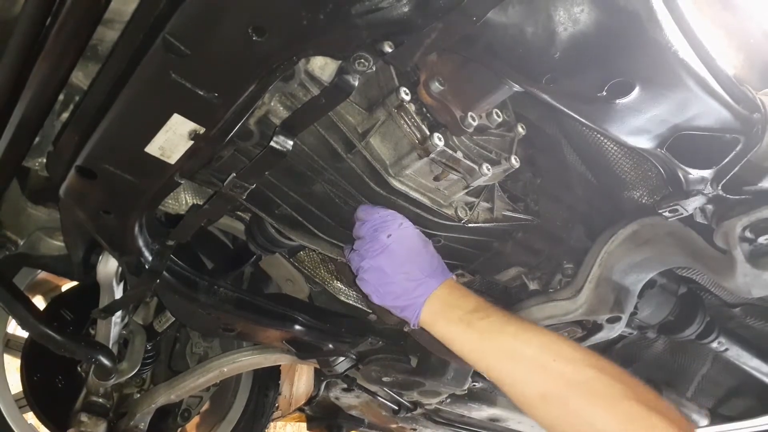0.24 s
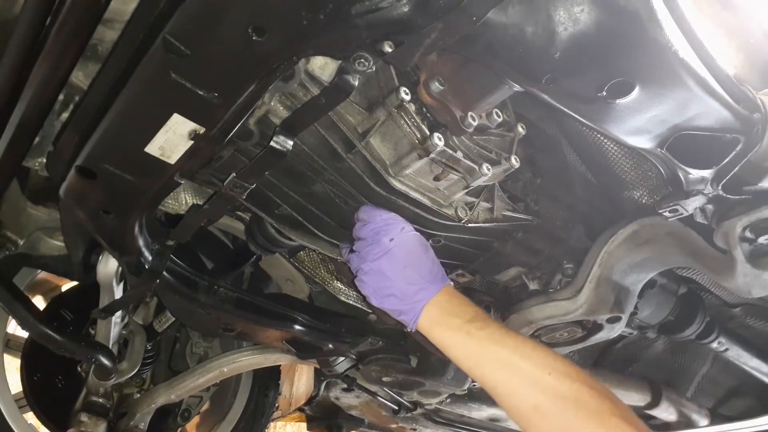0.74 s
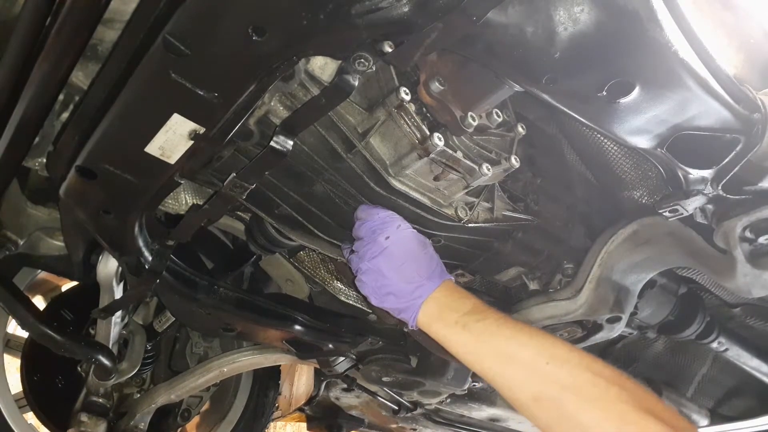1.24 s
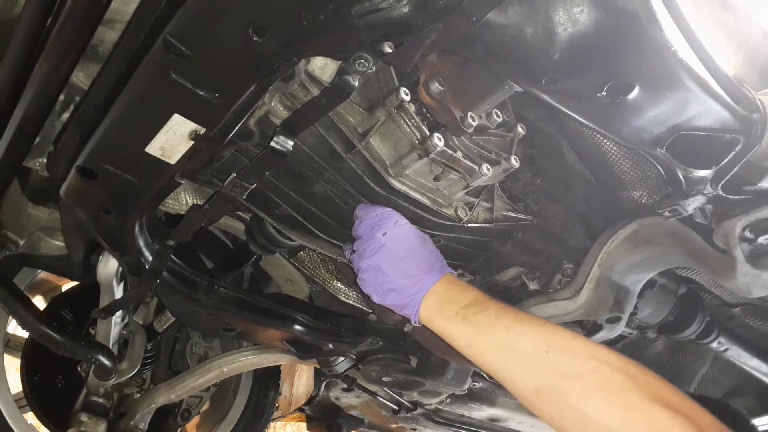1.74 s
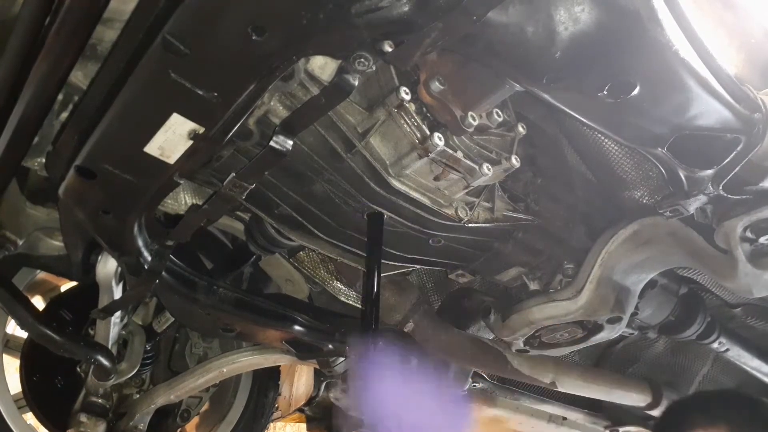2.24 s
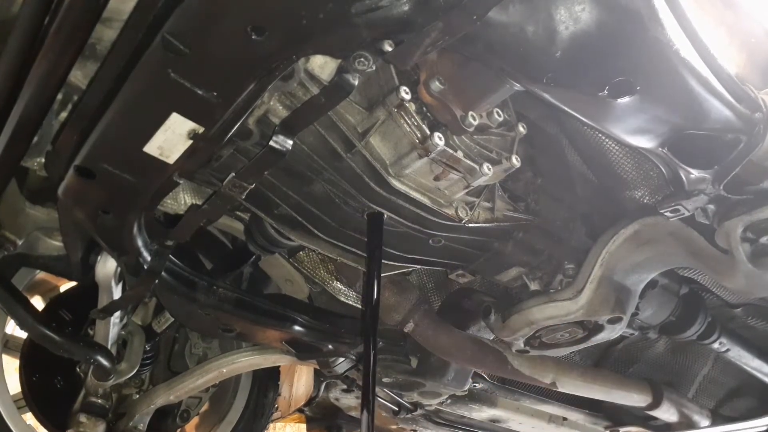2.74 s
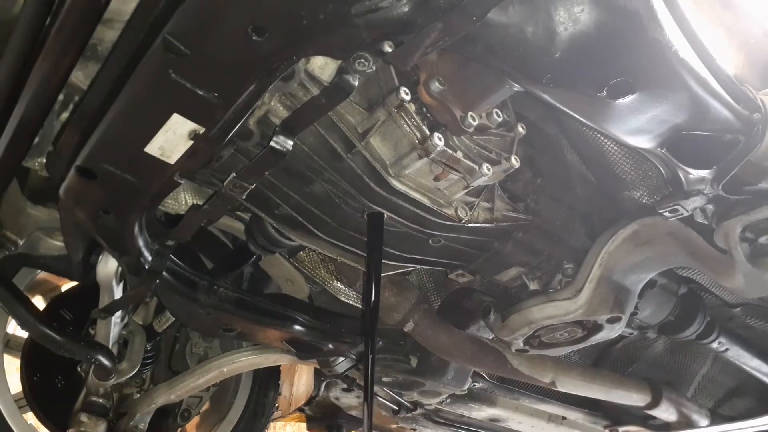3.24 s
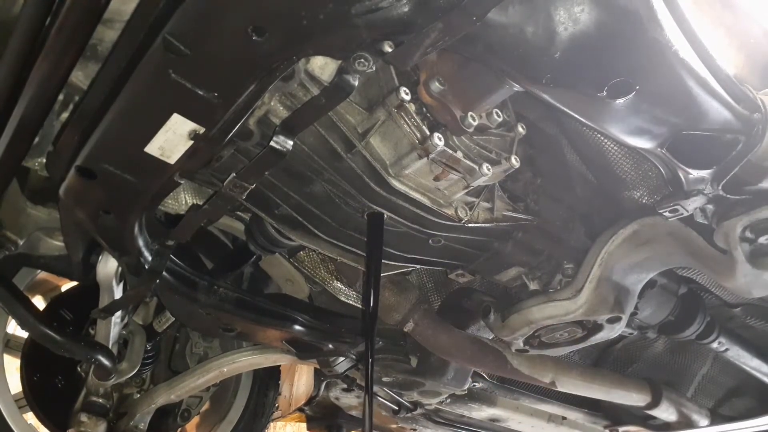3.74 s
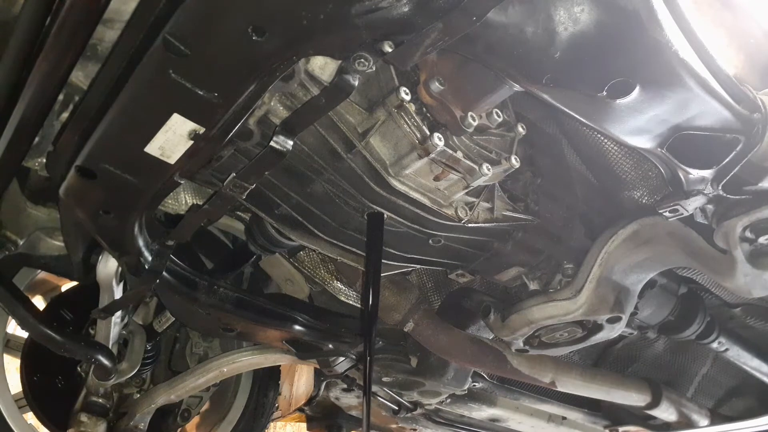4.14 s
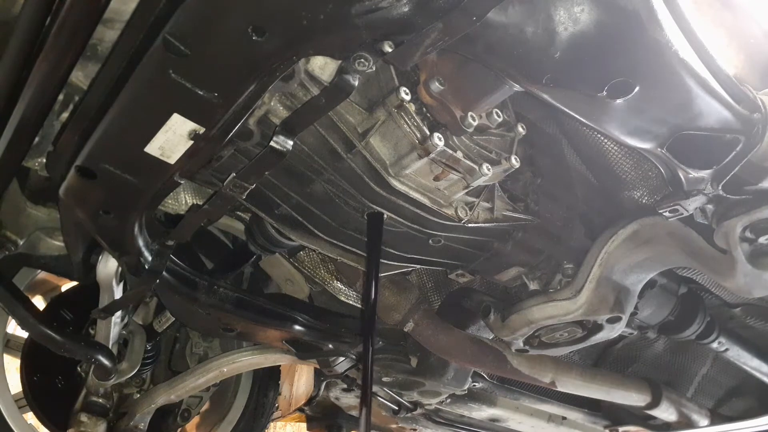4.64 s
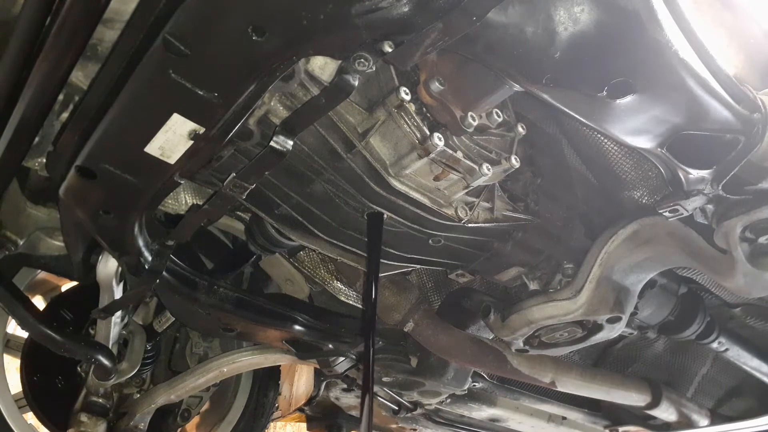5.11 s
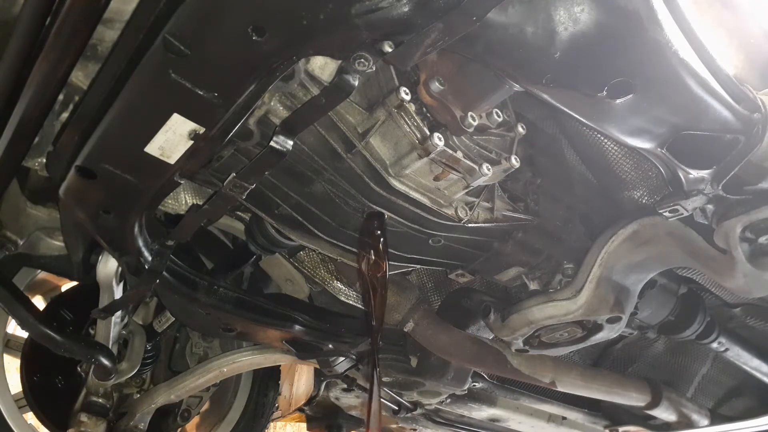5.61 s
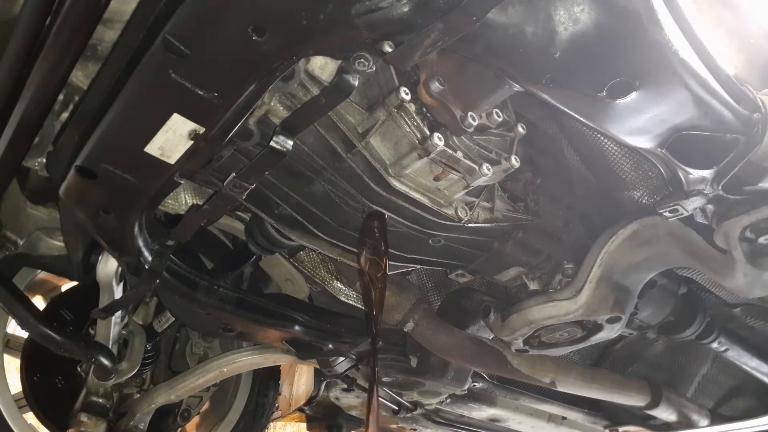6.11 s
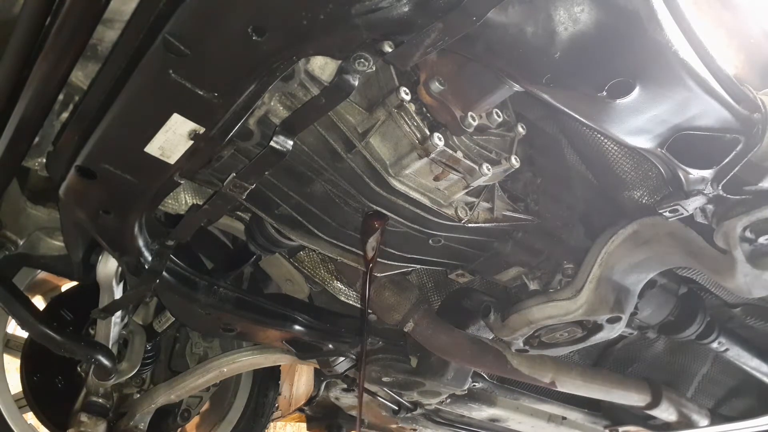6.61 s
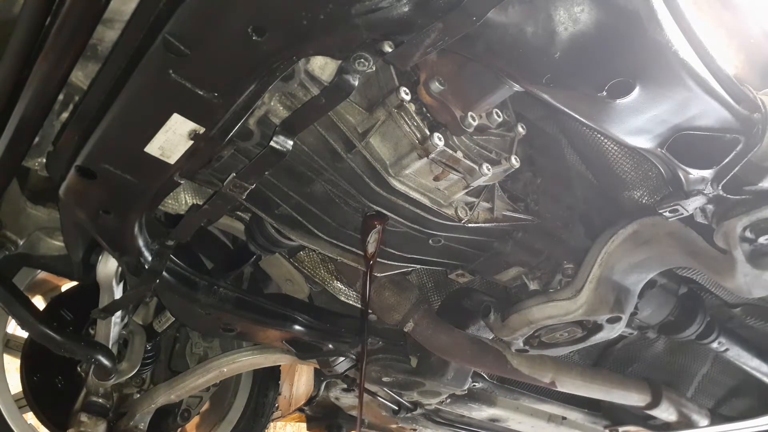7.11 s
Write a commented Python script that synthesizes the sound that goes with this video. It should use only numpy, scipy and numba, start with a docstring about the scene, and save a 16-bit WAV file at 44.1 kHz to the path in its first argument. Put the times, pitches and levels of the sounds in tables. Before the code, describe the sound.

Faint room air, a few dull knocks and two hard metallic clacks open the scene. Brief gushes of oil follow, then a continuous heavy pour with low thudding and fine splashing in a pan. The pour gurgles hollowly, then tears into uneven wet slaps, pops and tiny bright cracks. The microphone hears it near, slightly to the right, with short hard-wall garage reflections.

```python
"""Under a car on a lift in a garage, over faint air: a hand bumps the casing and a steel tool clacks as
struck, damped resonances. The loosened drain plug then lets out spurts, clouds of tiny ringing air pockets.
Next thick oil falls in a rope and drums on a catch pan. As air enters the hole the stream breaks up into
slaps, bubbles, crackles and squelches. Hard walls ring after every sound but the air."""
import sys
import numpy as np
from scipy import signal
from scipy.fft import rfft, irfft
from scipy.io import wavfile
from numba import njit

SR = 44100
rng = np.random.default_rng(int(sys.argv[2]) if len(sys.argv) > 2 else 0)


def to_wav(s):
    """Save 16-bit WAV."""
    ch = np.atleast_2d(s).T  # columns
    pcm = np.round(np.clip(ch, -1, 1) * 32767)  # PCM
    wavfile.write(sys.argv[1], SR, pcm.astype(np.int16))


N = 324379
T = np.arange(N) / SR  # s
FREQS = np.maximum(np.arange(N // 2 + 1) * SR / N, 1)  # Hz


def undb(db):
    """Logarithmic level: decibels to amplitude gain."""
    return 10 ** (np.asarray(db) / 20)


def unit(x):
    """Normalisation: scale to an rms of 1."""
    return x / np.sqrt(np.mean(x ** 2))


def lookup(points, hz=FREQS):
    """Logarithmic pitch axis: interpolate (Hz, value) points along it."""
    f, value = np.transpose(points)
    return np.interp(np.log(hz), np.log(f), value)


def curve(points):
    """Level envelope in dB: join (s, dB) points by straight lines, practically silent outside them."""
    return np.interp(T, *np.transpose(points), left=-120, right=-120)


def colour(x, db):
    """Linear filtering: multiply the spectrum by a gain in dB for every frequency."""
    return irfft(rfft(x) * undb(db), N)


def walk(rate):
    """Random modulation: a wander of spread 1 with about `rate` turns a second."""
    return 1.2 * np.interp(T * rate, np.arange(4096), rng.standard_normal(4096))


def swell(start, attack):
    """Exponential build-up, squared for a smooth start, from silence to 1."""
    return (1 - np.exp(-np.maximum(T - start, 0) / attack)) ** 2


def add(track, s, sound):
    """Superposition: mix a sound in at a time in seconds."""
    i = int(s * SR)
    track[i:i + len(sound)] += sound[:N - i]


def burst(db, decay):
    """Impulsive excitation: a noise crack of even, coloured spectrum; a slower decay starts softer."""
    t = T[:SR // 3]
    gain = undb(np.interp(np.arange(len(t) // 2 + 1) * SR / len(t), FREQS, db))
    attack = 1 - np.exp(-t / (0.054 * decay))
    # phases of a decaying noise keep the energy near the start
    scatter = np.angle(rfft(rng.standard_normal(len(t)) * attack * np.exp(-t / decay)))
    crack = irfft(gain * np.exp(1j * scatter), len(t))
    crack = crack * attack * np.exp(-t / (10 * decay))
    # a longer contact carries more energy
    return crack * np.sqrt(decay * SR / 2 / np.sum(crack ** 2))


def smack(hz, octaves):
    """Broad resonance in dB: a hump around its centre, tilted towards the bass."""
    away = np.log2(FREQS / hz)
    return -12 * np.log10(1 + (away / octaves) ** 4) - 1.33 * away


@njit
def rings(times, sizes, hz, t60, rise):
    """Damped oscillators: sines that swell over their first cycle and climb in pitch as they fade."""
    out = np.zeros(N)
    for k in range(len(times)):
        start, length, phase = int(times[k] * SR), int(t60[k] * SR) + 2, 0.
        for i in range(min(length, N - start)):
            age = i / length
            phase += 2 * np.pi * min(hz[k] * (1 + rise[k] * age), .45 * SR) / SR
            attack = min(phase / (2 * np.pi), 1.)
            fade = np.exp(-np.log(1000) * age)  # 60 dB over the length
            out[start + i] += sizes[k] * attack * fade * np.sin(phase)
    return out


def grains(spectrum, rate, cycles, spread_db):
    """Granular texture: `rate` tiny bursting pockets a second, of random size and pitch, coloured as one."""
    when, pitch, size, life = rng.random((60000, 4))[:int(min(rate * N / SR, 60000))].T
    low, high = spectrum[0][0], spectrum[-1][0]
    hz = low * (high / low) ** pitch
    # sizes are exponential in dB; short high pockets are stronger, which keeps the cloud white
    sizes = undb(-abs(spread_db) * np.log(1 - .99 * size)) * hz / low
    t60 = cycles * (.5 + life) / hz
    cloud = rings(when * N / SR, sizes, hz, t60, life * 0.33)
    return colour(cloud, lookup(spectrum))


# Likeness of the two channels in diffuse sound: frequency_hz, correlation [-1 to 1]
LIKENESS = [(100, 1), (250, 0.8), (500, 0.62), (1000, -0.2), (2500, 0)]


def diffuse(size):
    """Diffuse field: two channels of white noise, alike in the bass and unrelated in the treble."""
    hz = np.maximum(np.arange(size // 2 + 1) * SR / size, 1)
    likeness = np.clip(lookup(LIKENESS, hz), -1, 1)
    mid, side = rfft(rng.standard_normal((2, size)))
    mid = mid * np.sqrt((1 + likeness) / 2)
    side = side * np.sqrt((1 - likeness) / 2)
    return irfft(np.array([mid + side, mid - side]), size)


# Colour of the garage's still air: frequency_hz, level_db
AIR = [(15, -57), (25, -23), (123, -2.5), (153, -11.5), (293, -13.5), (384, -20.5), (503, -19), (607, -21),
       (962, -18), (1370, -23), (3920, -27), (10700, -33), (16000, -42)]
AIR_DB, AIR_SAG_DB_PER_S = -57.5, 0.97  # level at the start; the hiss slowly sinks


def still_air():
    """Random noise: diffuse, coloured hiss that slowly sinks, with a slight wander in level."""
    level_db = AIR_DB - AIR_SAG_DB_PER_S * T + .5 * walk(3.8)
    return unit(colour(diffuse(size=N), lookup(AIR))) * undb(level_db)


# Reverberation of the garage: frequency_hz, t60_s
ROOM_T60 = [(100, 0.73), (500, 0.3), (1500, 0.33), (5000, 0.29), (14000, 0.28)]


def wall_ring(size):
    """Reverberation: one spot's answer to a click, early echoes and a quickening fade in each band."""
    noise, tail, t = rfft(diffuse(size)), 0, T[:size]
    hz = np.maximum(np.arange(size // 2 + 1) * SR / size, 1)
    for k, (_, t60) in enumerate(ROOM_T60):
        # overlapping bands that sum to 1
        band = lookup([(f, float(j == k)) for j, (f, _) in enumerate(ROOM_T60)], hz)
        fade = undb(-60 * (t / t60) ** 1.3)
        fade = fade * (1 - np.exp(-t / 0.00013))
        tail = tail + irfft(noise * band, size) * fade / np.sqrt(np.sum(fade ** 2))
    return tail


def garage(x, wet_db, bass_wet_db, left_lead_ms, count):
    """Direct and reverberant sound: one side leads, and the source wanders over `count` spots that ring."""
    wet = undb(lookup([(200, bass_wet_db), (900, wet_db)]))  # ring relative to direct sound
    spectrum = rfft(x) / np.sqrt(1 + wet ** 2)
    lead = np.pi * FREQS * left_lead_ms / 1000 * np.array([[1], [-1]])  # half the lead on each side
    out = irfft(spectrum * np.exp(1j * lead), N)
    shares = np.array([np.exp(1.5 * walk(70)) for _ in range(count)])
    sent = irfft(spectrum * wet, N) * shares / np.sqrt(np.sum(shares ** 2, axis=0))
    for part in sent:
        out = out + signal.oaconvolve(part[None], wall_ring(size=32768), axes=1)[:, :N]
    return out


# Dull bumps of the hand on the casing: start_s, level_db, centre_hz, width_octaves, decay_s
BUMPS = [(.173, -49, 950, 0.35, .003), (.384, -50, 1050, .4, .003), (.576, -45, 960, 0.53, 0.0017),
         (1.165, -47.5, 750, .6, .003), (1.247, -41.5, 390, 1.7, 0.0054), (1.276, -39, 223, 0.39, 0.004)]
# Bright, very short click as the tool snaps free, ringing in the garage:
# start_s, level_db, centre_hz, width_octaves, decay_s
TOOL_CLICK = [(.9022, -12, 9500, .7, .0006)]
# Thin films of oil cracking: start_s, level_db, centre_hz, width_octaves, decay_s
CRACKLES = [(4.668, -28, 8400, 0.34, 0.0022), (5.4, -21, 8500, 0.38, .0015), (5.43, -27, 7000, 0.3, 0.0018),
            (5.437, -16, 3200, .35, .003), (5.4616, -20, 5670, .15, 0.0015), (5.472, -21, 9350, .15, .002),
            (5.506, -35, 6500, .5, .002), (5.548, -28, 10500, .3, .003), (5.573, -27, 7000, .25, .002),
            (5.578, -17.5, 4240, 0.1, 0.0038), (5.591, -26, 8000, .7, .002), (5.595, -32, 2100, 0.51, .002),
            (5.6265, -24, 11500, .3, .003), (5.769, -14, 10700, 0.45, 0.002),
            (5.77, -17.5, 4280, 0.15, 0.0017), (5.863, -28, 4700, 0.25, .003),
            (5.957, -26, 8500, 0.57, 0.0034), (5.993, -23.5, 4400, .4, .002), (6.031, -35, 3900, 0.3, .002),
            (6.052, -30, 8000, 0.37, .003), (6.071, -27.5, 7500, 0.58, 0.0031),
            (6.075, -26, 4970, 0.27, .002), (6.076, -19.5, 1150, 0.69, 0.003),
            (6.166, -28.5, 4270, 0.24, 0.0034), (6.213, -20.5, 3220, .25, .003),
            (6.258, -29, 12000, 0.46, 0.0025), (6.275, -22.5, 10900, 0.33, 0.0037),
            (6.275, -21, 1300, 0.83, .0025), (6.313, -31, 5400, 0.23, 0.0034),
            (6.368, -22.5, 1580, .4, 0.0037), (6.382, -28, 6200, .25, .004), (6.461, -29, 3880, .15, .002),
            (6.476, -13, 2500, 0.35, 0.0022), (6.487, -20.5, 5400, 0.5, 0.0027),
            (6.513, -23.5, 10200, 0.88, 0.0024), (6.604, -31.5, 6900, .15, 0.0033),
            (6.617, -26, 12500, 1, 0.0053), (6.63, -17.5, 2420, 0.24, 0.0028),
            (6.838, -34, 13000, .4, .003), (6.854, -31, 4500, .6, .003),
            (6.9063, -10.5, 4870, 0.13, 0.0024), (6.9996, -18.5, 5630, .27, 0.0017),
            (7.284, -31.5, 10000, 1, 0.019)]


def ticks(rows):
    """Heavily damped impact: short toneless knocks or cracks, each a hump of noise around its centre."""
    out = np.zeros(N)
    for s, db, hz, octaves, decay in rows:
        add(out, s, undb(db) * burst(smack(hz, octaves), decay))
    return out


# Steel clacks: start_s, level_db, contact_decay_s, brightness_db_per_octave, ring_level_db,
# pitch_ratio, damping_ratio (pitch and width of the ring against the steel's own)
CLACKS = [(.7255, -24, 0.009, -.6, 1.5, 1.021, .55), (0.7655, -9, 0.0074, -0.36, -18, 1.04, 1),
          (0.77, -8, 0.0052, 2.1, -9, 1.04, 1), (0.9021, -17, 0.0007, 0.3, 4, 1, 1.3),
          (.909, -23, 0.007, 0, -1.5, .995, 1.1)]
# Colour of a clack's contact: frequency_hz, level_db
CLACK = [(30, -37), (90, -12.5), (170, -10), (250, -2.5), (330, -7), (450, 1), (700, 0), (1000, -2.5),
         (1700, 0), (3000, -2), (5000, -3), (8000, -2), (12000, 0.5), (16000, -12)]
# Damped resonances of the hand-held steel: frequency_hz, nominal width_hz, level_db
STEEL = [(2800, 200, -8), (3950, 400, -9), (5680, 380, 6), (8850, 1100, -1.5), (11300, 1300, 1)]


def clacks():
    """Impact and modal ringing: a bright steel crack, and a short ring that the grip damps and detunes."""
    out = np.zeros(N)
    for s, db, decay, tilt_db, ring_db, pitch, damping in CLACKS:
        crack = burst(lookup(CLACK) + tilt_db * np.log2(FREQS / 1000), decay)
        power = 0
        for hz, width, mode_db in STEEL:
            detuning = 2.4 * (FREQS - hz * pitch) / (width * damping)
            power = power + undb(mode_db) ** 2 / (1 + detuning ** 2) ** 2
        ring = burst(10 * np.log10(power), decay)
        add(out, s, undb(db) * (crack + undb(ring_db) * ring))
    return out


# Squeezed air pockets: start_s, length_s, level_db, first_pitch_hz, last_pitch_hz
SQUELCHES = [(2.508, .035, -31, 1550, 2100), (2.542, 0.065, -34, 1900, 2500),
             (2.61, 0.027, -32, 2500, 2750), (3.665, 0.099, -30.5, 1350, 1900),
             (4.693, 0.05, -38.5, 1840, 1840), (5.33, 0.11, -35.5, 2070, 2800),
             (5.841, 0.021, -35, 2050, 2450), (6.11, .048, -35.5, 1230, 2780),
             (6.597, 0.036, -39, 2120, 1020), (6.685, 0.026, -34.5, 1710, 1460),
             (6.798, .04, -35, 1300, 2640)]
SQUELCH_CYCLES, SQUELCH_SCATTER_OCTAVES = 16, .12  # cycles each pop takes to fade 60 dB; pitch scatter


def squelches(count):
    """Cavity resonance: oil squeezes an air pocket, and a run of tiny pops follows its course of pitch."""
    out = np.zeros(N)
    for s, length, db, first_hz, last_hz in SQUELCHES:
        along = (np.arange(count) + rng.random(count)) / count  # 0 to 1
        glide = first_hz * (last_hz / first_hz) ** along
        hz = glide * 2 ** (SQUELCH_SCATTER_OCTAVES * rng.standard_normal(count))
        sizes = np.sqrt(np.sin(np.pi * along)) * rng.random(count)
        pops = rings(s + length * along, sizes, hz, SQUELCH_CYCLES / hz, np.zeros(count))
        out += undb(db) * pops * np.sqrt(length * SR / np.sum(pops ** 2))
    return out


# Single bubbles: start_s, level_db, pitch_hz, film_snap_db (relative to the bubble)
BUBBLES = [(2.537, -25.5, 420, -17), (2.535, -15.5, 184.3, -32), (5.225, -16.5, 9170, -10),
           (5.27, -26, 283, -5), (5.436, -20, 2810, 0), (5.461, -19, 5600, -14), (5.593, -18, 1287, -2.5),
           (5.771, -29, 230, -10), (5.802, -24, 2050, -18), (6.077, -28, 1580, -6), (6.101, -24, 1046, -10),
           (6.475, -14, 2460, -9.5), (6.485, -28, 484, 6), (6.502, -25, 285, -17), (6.531, -28, 1170, -11),
           (6.6291, -18, 1763, -14), (6.629, -16.5, 2560, -14), (6.649, -25, 372, -2.5),
           (6.69, -34, 440, 1), (6.802, -30.5, 1400, -4), (6.869, -25, 1765, -5), (6.87, -30.5, 1147, 2.5),
           (6.906, -9, 4740, -20), (6.906, -13, 5270, -15), (6.9061, -10.5, 3750, -21),
           (6.9989, -20.5, 5100, -3), (7.0, -28, 6700, -18), (7.038, -30.5, 1640, -9),
           (7.075, -26, 842, -8), (7.224, -30, 870, -6), (7.227, -27, 456, -4)]
# t60 in s at 1 kHz, the power of pitch by which it shortens, and the climb as a share of pitch
BUBBLE_T60_S, BUBBLE_DAMPING, BUBBLE_RISE = 0.069, 0.46, 0.414
BRIEF_BUBBLE_HZ = 4130  # bubbles above this pitch burst before they can climb far
SNAP_OCTAVES, SNAP_DECAY_S = 0.79, 0.0071  # width and decay of a film's snap


def bubbles():
    """Bubble resonance: trapped air rings and climbs as it nears the surface; small bubbles die sooner."""
    s, db, hz, _ = np.array(BUBBLES, float).T.copy()
    khz = hz / 1000
    rise = BUBBLE_RISE / (1 + (hz / BRIEF_BUBBLE_HZ) ** 2)
    return rings(s, undb(db), hz, BUBBLE_T60_S / khz ** BUBBLE_DAMPING, rise)


def snaps():
    """Film rupture: each bubble's skin breaks with a short noise snap around its pitch."""
    out = np.zeros(N)
    for s, db, hz, snap_db in BUBBLES:
        add(out, s, undb(db + snap_db) * burst(smack(hz, SNAP_OCTAVES), SNAP_DECAY_S))
    return out


# Colour of the froth: frequency_hz, level_db
FROTH = [(500, -7), (900, 0), (1600, 4.5), (2300, -2), (3000, -9)]
# Froth whipped up by the slackening stream: time_s, level_db
FROTH_LEVEL = [(4.85, -43), (5.0, -36), (5.4, -37), (5.7, -59)]


def froth():
    """Bubble cloud: many small resonators, each at its own pitch."""
    return unit(grains(FROTH, rate=900, cycles=18, spread_db=1.5)) * undb(curve(FROTH_LEVEL))


TEAR_S, TEAR_WIDTH_S = 5.45, 0.12  # air enters the hole and tears the rope of oil


def torn():
    """Smooth transition: how far the rope of oil has torn, 0 to 1."""
    return .5 + .5 * np.tanh((T - TEAR_S) / TEAR_WIDTH_S)


# Colour of the loose droplets: frequency_hz, level_db
DROPLETS = [(600, -1), (1100, 3.5), (2200, -4.5), (3500, 2.5), (7000, -24), (11000, -47)]
# Splashing of the free stream, which the droplets follow too: time_s, level_db
FLOW = [(3.26, -66), (3.31, -46.5), (3.39, -35), (4.25, -34), (4.85, -36.5), (5.1, -29), (5.52, -29),
        (5.72, -41), (6.15, -37.5), (6.6, -42), (6.95, -43.5), (7.13, -53.5), (7.22, -43.5), (7.36, -31.5)]
DROPLET_DB = -2.5  # relative to the splashing


def droplets():
    """Jet break-up: fine drops from the torn rope crackle on the pool."""
    drops = grains(DROPLETS, rate=260, cycles=6, spread_db=2.6)
    return unit(drops) * torn() * undb(curve(FLOW) + DROPLET_DB)


# Resonances of the pan: frequency_hz, width_hz, boost_db
PAN = [(220, 135, 9.5), (618, 33, 6.5), (874, 49, 3.5), (1140, 46, 3), (1820, 100, 1)]


def pan_boost():
    """Resonant gain in dB that the pan gives to the slaps, plops and spatter."""
    return sum(db / (1 + (2 * (FREQS - hz) / width) ** 2) for hz, width, db in PAN)


# Lumps of oil slapping into the pan: start_s, level_db, centre_hz, decay_s, spray_db (relative)
SLAPS = [(2.421, -20, 870, 0.0032, -28), (2.487, -15.5, 910, 0.0074, -10), (2.543, -26.5, 1490, 0.0051, 10),
         (3.383, -20.5, 1000, 0.01, -24), (5.434, -23, 2630, 0.004, 6.5), (5.574, -23.5, 2980, 0.0073, -4),
         (5.768, -20, 1280, 0.007, 2.5), (5.788, -22, 900, .004, -18), (5.859, -25.5, 1000, 0.0068, -6),
         (5.901, -24.5, 597, 0.016, -9), (5.993, -33, 1500, 0.0091, 12), (6.011, -20.5, 700, .003, -7),
         (6.024, -23, 990, .003, -7), (6.076, -23, 900, 0.0029, -8), (6.146, -25, 800, .003, -6),
         (6.212, -23, 436, 0.0063, -3.5), (6.274, -18.5, 850, 0.0027, -9), (6.362, -24.5, 925, 0.0029, 0),
         (6.476, -17, 1300, 0.0042, -7), (6.531, -21.5, 646, 0.0059, -8), (6.624, -29.5, 1000, 0.011, 6),
         (6.856, -25, 1000, 0.0041, -5), (7.167, -31.5, 613, 0.0073, 2), (7.262, -22.5, 1270, 0.0036, -11),
         (7.307, -17.5, 1730, 0.024, -3.5)]
# Colour of the finer mist from squirts and slaps: frequency_hz, level_db
MIST = [(3500, 3), (5400, 0.5), (7500, -4), (9500, -2), (12000, 0), (14500, -5), (16500, -16)]
SLAP_OCTAVES = 1.37  # width of a slap's smack


def slaps():
    """Liquid impact: each lump lands with a wet smack and a puff of spray."""
    out, pan, mist = np.zeros(N), pan_boost(), lookup(MIST)
    for s, db, hz, decay, spray_db in SLAPS:
        landing = burst(smack(hz, SLAP_OCTAVES) + pan, decay)
        puff = undb(spray_db) * burst(mist, decay)
        add(out, s, undb(db) * (landing + puff))
    return out


# The pan's liveliest modes: frequency_hz, width_hz, level_db
PAN_MODES = [(620, 40, 0), (868, 60, -6), (1150, 120, -5.5)]
# The slackening stream strikes a livelier part of the pan: time_s, level_db
PAN_SONG = [(4.8, -45), (4.95, -30), (5.25, -27), (5.42, -34.5), (5.7, -44.5), (6.3, -43), (7.3, -65)]
# Colour of the plops that drive the modes and fill the stream: frequency_hz, level_db
STREAM_PLOPS = [(180, -9.5), (290, -3), (400, -1.5), (500, -5.5), (900, -4.5), (1250, -9.5), (1900, -16.5)]
SLOSH_SHARE, SLOSH_RATE = .012, 14  # spread of the shift as a share of pitch; turns a second


def pan_song():
    """Forced modes: dense plops set the pan gurgling, and sloshing oil bends each mode's pitch."""
    plops = rfft(grains(STREAM_PLOPS, rate=900, cycles=5, spread_db=1.5))
    out = 0
    for hz, width, db in PAN_MODES:
        mode = irfft(plops * undb(db) / (1 + 2j * (FREQS - hz) / width), N)
        slosh_s = np.cumsum(SLOSH_SHARE * walk(SLOSH_RATE)) / SR
        out = out + np.interp(T + slosh_s, T, mode)  # a varying delay bends the pitch
    return unit(out) * undb(curve(PAN_SONG))


def pour(gains, lumps_db, plop_colour, spatter_colour, spray_colour):
    """Air entrainment: falling oil folds in air and throws spatter and spray; lumps swell all three."""
    lumps = lumps_db * (walk(22) + walk(110))
    pan = pan_boost()
    plops = unit(colour(grains(plop_colour, rate=1100, cycles=4.2, spread_db=1.5), pan))
    spatter = unit(colour(grains(spatter_colour, rate=3000, cycles=18, spread_db=2.5), pan))
    spray = unit(grains(spray_colour, rate=7000, cycles=5, spread_db=1.8))
    return undb(lumps) * np.sum(gains * np.array([plops, spatter, spray]), axis=0)


# Gushes, first past the plug, later within the stream: start_s, length_s, level_db,
# spatter_db, spray_db, thud_db (the last three relative to the level)
GUSHES = [(1.444, .26, -40.5, -5.5, -8, -2.5), (1.97, 0.17, -60.5, 2.5, -2.5, 1),
          (2.132, 0.38, -33.5, -5.5, -7, -5.5), (2.488, 0.16, -34.5, 2.5, -6.5, -12),
          (2.79, 0.18, -59, -3.5, -15, -17), (3.382, 0.18, -32, 1.5, -5.5, -2),
          (3.643, 0.1, -23.5, 2.5, -2.5, -1.5), (4.316, 0.21, -43.5, -19, 4.5, -12)]
GUSH_ATTACK_S, GUSH_RELEASE_S = 0.05, 0.019


def gush_gains():
    """Transient flow: gains of plops, spatter, spray and thuds as each gush swells, holds and dies away."""
    gains = np.zeros((4, N))
    for s, length, db, spatter_db, spray_db, thud_db in GUSHES:
        release = np.exp(-np.maximum(T - s - length, 0) / GUSH_RELEASE_S)
        shape = swell(s, GUSH_ATTACK_S) * release
        gains += undb(db) * np.outer(undb([0, spatter_db, spray_db, thud_db]), shape)
    return gains


# Colour of a gush's plops: frequency_hz, level_db
SPURT_PLOPS = [(180, -24), (300, -2.5), (410, 7.5), (520, 0.5), (620, 1.5), (900, 4), (1250, -3.5),
               (1900, -57)]
# Colour of a gush's spatter: frequency_hz, level_db
GUSH_SPATTER = [(900, 5), (1500, 4), (2100, 0.5), (3000, -1.5), (4800, -5), (7500, -16)]
GUSH_LUMPS_DB = 2  # swell of its lumps


def gushes():
    """Spurting flow: plops, spatter and mist under short envelopes."""
    return pour(gush_gains()[:3], GUSH_LUMPS_DB, SPURT_PLOPS, GUSH_SPATTER, MIST)


# Colour of the stream's spatter: frequency_hz, level_db
SPATTER = [(900, 1), (1400, 3), (2200, 2), (3000, -1.5), (4800, -9.5), (7500, -33)]
# Colour of the stream's spray: frequency_hz, level_db
SPRAY = [(3500, 10), (5400, 9.5), (7500, 4), (9500, 2), (12000, -2.5), (14500, -4), (16500, -10)]
ROPE_S, ROPE_ATTACK_S, ROPE_DB = 3.235, 0.19, -30  # the unbroken rope lands, builds up and drums
# relative to the splashing; the spray thins as the head of oil falls
SPATTER_DB, SPRAY_DB, SPRAY_SAG_DB_PER_S = -5, -4.5, 0.9
ROPE_LUMPS_DB, TORN_LUMPS_DB = -0.06, 3.5  # swell of the stream's lumps before and after it tears


def stream():
    """Free jet: plops, spatter and spray all follow the flow, which grows lumpy as the rope tears."""
    spray_db = SPRAY_DB - SPRAY_SAG_DB_PER_S * (T - ROPE_S)
    shares = np.array([np.ones(N), np.full(N, undb(SPATTER_DB)), undb(spray_db)])
    lumps_db = ROPE_LUMPS_DB + (TORN_LUMPS_DB - ROPE_LUMPS_DB) * torn()
    return pour(undb(curve(FLOW)) * shares, lumps_db, STREAM_PLOPS, SPATTER, SPRAY)


# Colour of the rope's thuds on the pan: frequency_hz, level_db
DRUM = [(25, -18), (45, -16), (75, -1.5), (115, 1), (150, -9.5), (185, -1.5), (235, -6), (300, -31),
        (450, -41)]
# Colour of a gush's lighter thuds: frequency_hz, level_db
GUSH_DRUM = [(40, -34), (72, 1), (110, 2.5), (180, -1.5), (260, -1), (400, -14)]
TEAR_DROP_DB, TEAR_SAG_DB_PER_S = 9, 5.5  # torn, the drumming drops, then keeps sagging


def drumming():
    """Viscous buckling: the rope folds and thuds on the pan, less once torn; gushes thud lightly."""
    loss_db = TEAR_DROP_DB * torn() + TEAR_SAG_DB_PER_S * np.maximum(T - TEAR_S, 0)
    rope = unit(grains(DRUM, rate=600, cycles=8.2, spread_db=1.0))
    rope = rope * swell(ROPE_S, ROPE_ATTACK_S) * undb(ROPE_DB - loss_db)
    gush_thuds = unit(grains(GUSH_DRUM, rate=700, cycles=5.6, spread_db=2.0)) * gush_gains()[3]
    return rope + gush_thuds


# Where the oil lands: time_s, left_minus_right_db
PLACE = [(2.5, 2.5), (3.4, 0.5), (4.3, -1), (5.0, 1), (5.6, 1.8), (7.3, 2.5)]


def scene():
    """Superposition: air, tool and oil, each of the last two with its share of the garage's ring."""
    air = still_air()
    tool = garage(clacks() + ticks(BUMPS), wet_db=6.0, bass_wet_db=-1.5, left_lead_ms=0.15, count=4)
    click = garage(ticks(TOOL_CLICK), wet_db=5, bass_wet_db=-4, left_lead_ms=0.16, count=2)
    crackling = garage(ticks(CRACKLES), wet_db=-3.0, bass_wet_db=-6, left_lead_ms=0.16, count=2)
    # bubbles burst at the open surface, in plain view of the microphone
    open_surface = bubbles() + droplets() + squelches(count=36)
    popping = garage(open_surface, wet_db=-7.5, bass_wet_db=-20.0, left_lead_ms=0.13, count=3)
    slapping = garage(slaps() + snaps(), wet_db=0.5, bass_wet_db=-4.0, left_lead_ms=0.12, count=2)
    splashes = gushes() + stream() + pan_song() + froth()
    splashing = garage(splashes, wet_db=4.5, bass_wet_db=-3.0, left_lead_ms=.12, count=5)
    pan = garage(drumming(), wet_db=-23, bass_wet_db=-5.5, left_lead_ms=-0.24, count=3)
    place = undb(np.interp(T, *np.transpose(PLACE)) * np.array([[.5], [-.5]]))
    oil = (splashing + slapping + popping + crackling + pan) * place
    return oil + tool + click + air


# Lean of the microphone: frequency_hz, left_minus_right_db
LEAN = [(100, -5), (1200, -5), (4500, -6.5), (9000, -0.7), (15000, -2)]
TOP_HZ = 15900


def record(dry):
    """Band limiting: the microphone leans right, least in the treble, and cuts deepest bass and top treble."""
    leaning = colour(dry, lookup(LEAN) * np.array([[.5], [-.5]]))
    thinned = signal.sosfilt(signal.butter(4, 35, "high", fs=SR, output="sos"), leaning)
    return signal.sosfilt(signal.ellip(10, .2, 80, TOP_HZ, fs=SR, output="sos"), thinned)


dry = scene()
out = record(dry)
to_wav(out)
```